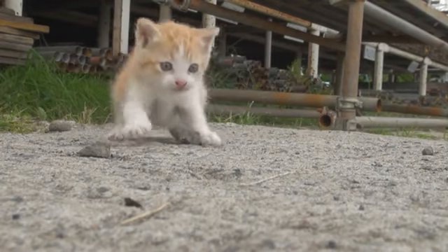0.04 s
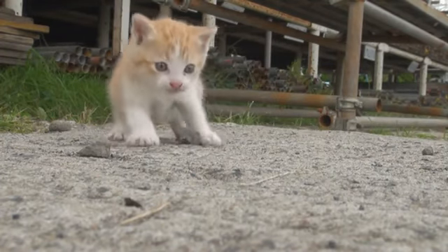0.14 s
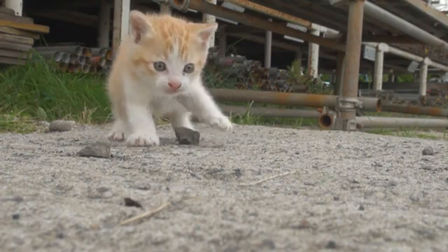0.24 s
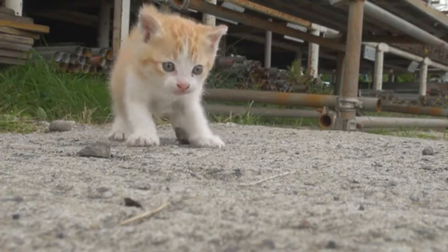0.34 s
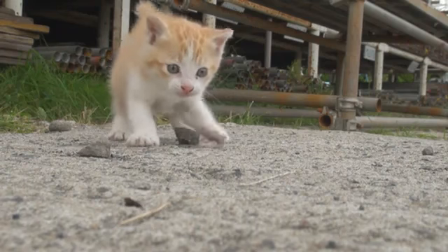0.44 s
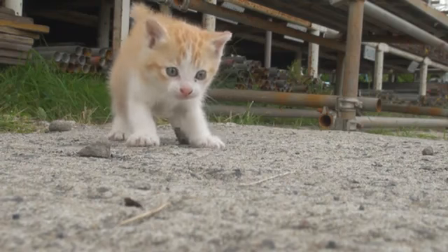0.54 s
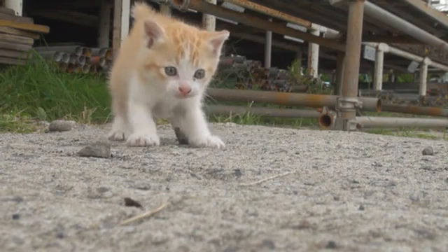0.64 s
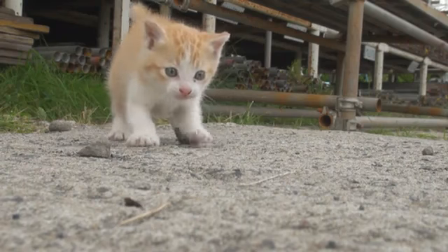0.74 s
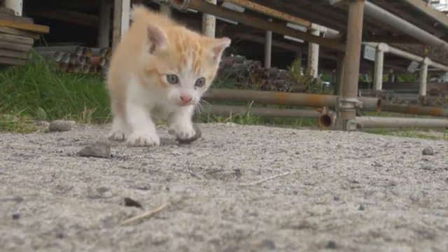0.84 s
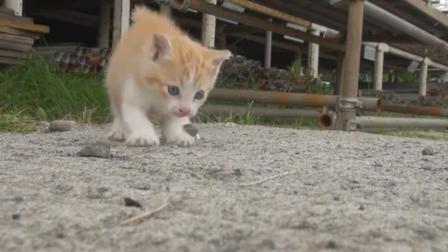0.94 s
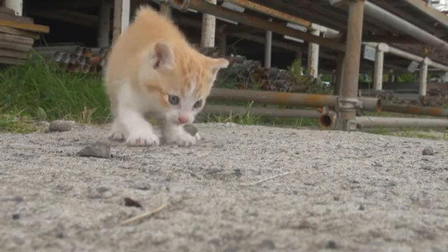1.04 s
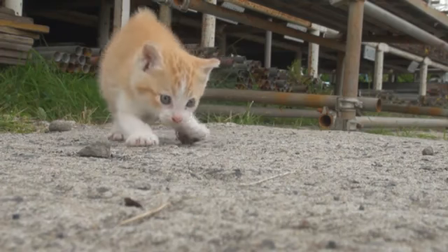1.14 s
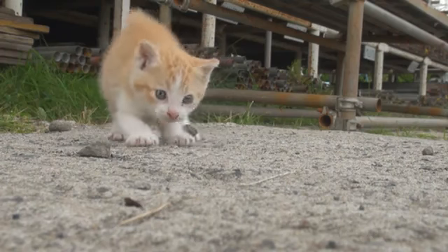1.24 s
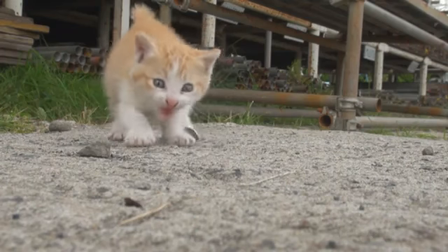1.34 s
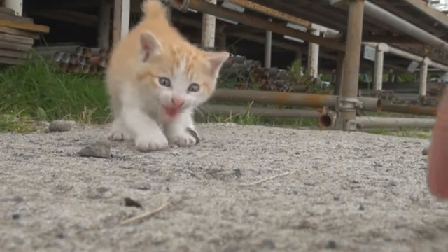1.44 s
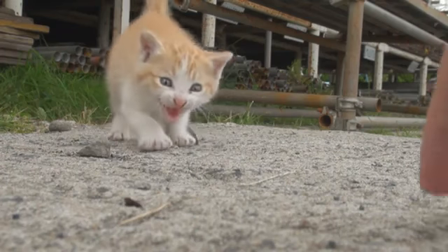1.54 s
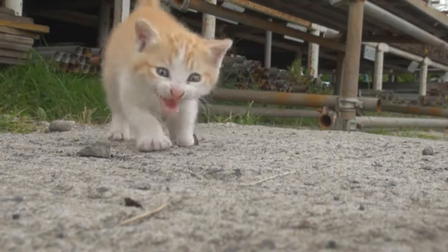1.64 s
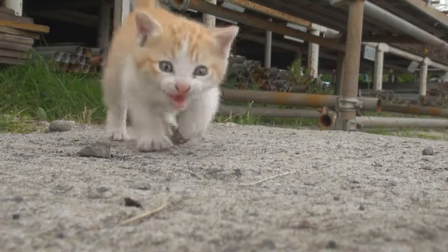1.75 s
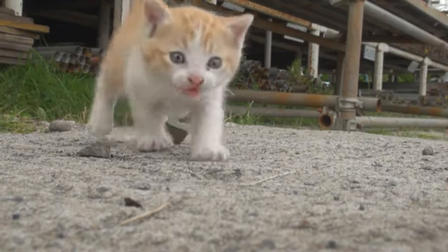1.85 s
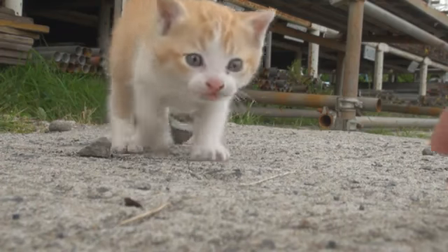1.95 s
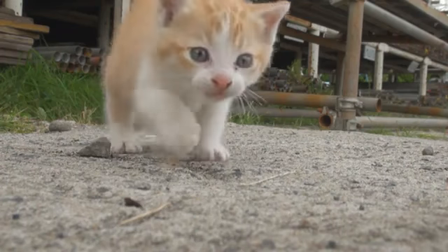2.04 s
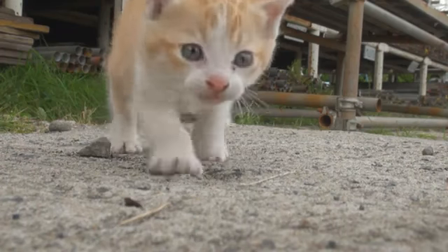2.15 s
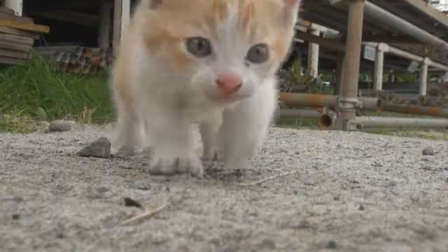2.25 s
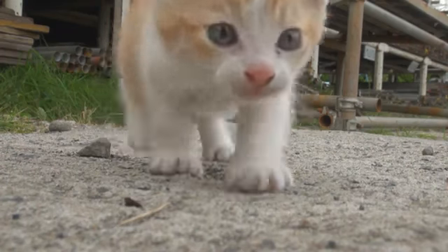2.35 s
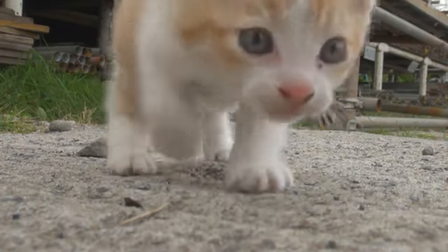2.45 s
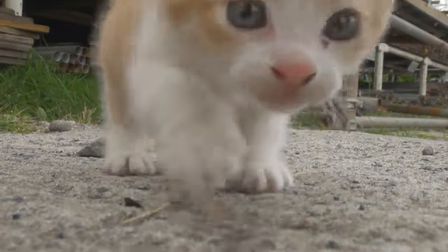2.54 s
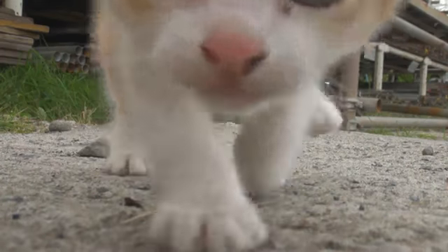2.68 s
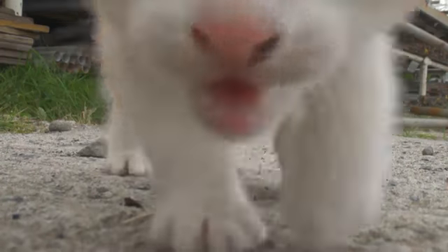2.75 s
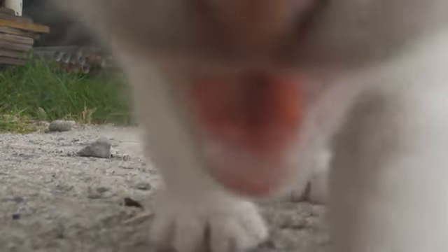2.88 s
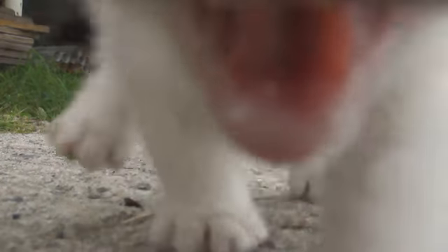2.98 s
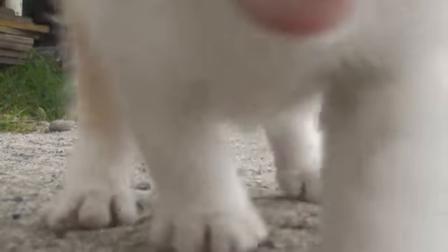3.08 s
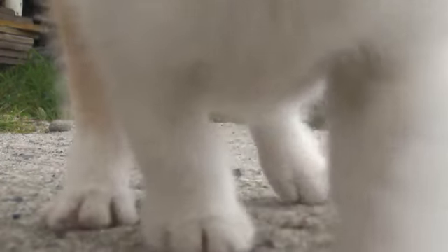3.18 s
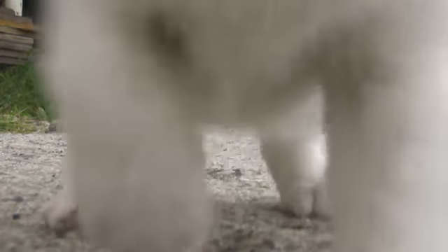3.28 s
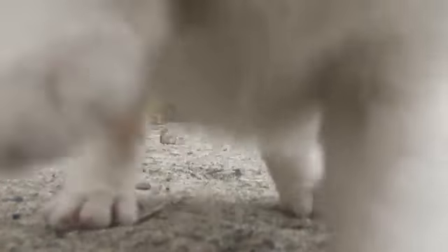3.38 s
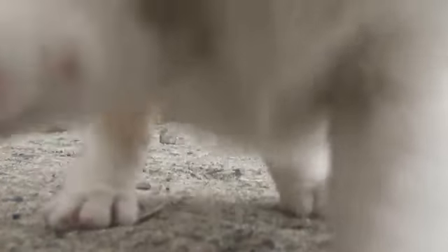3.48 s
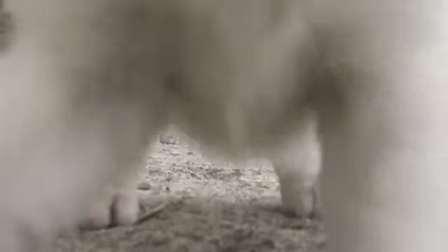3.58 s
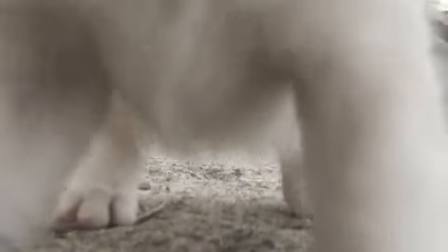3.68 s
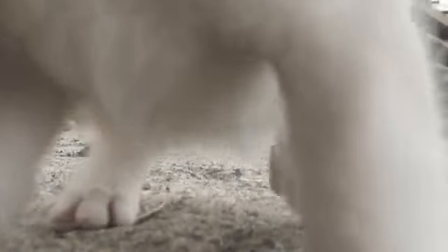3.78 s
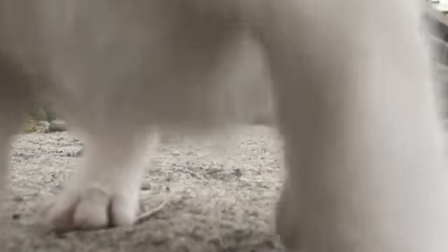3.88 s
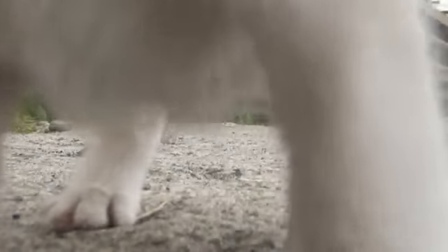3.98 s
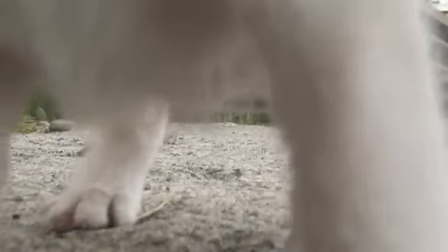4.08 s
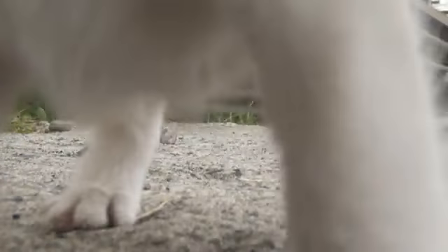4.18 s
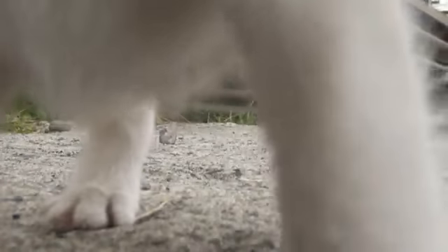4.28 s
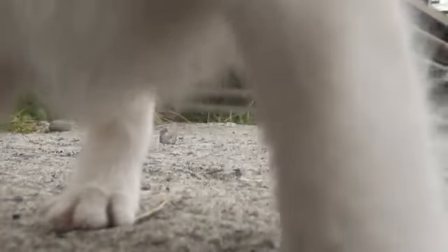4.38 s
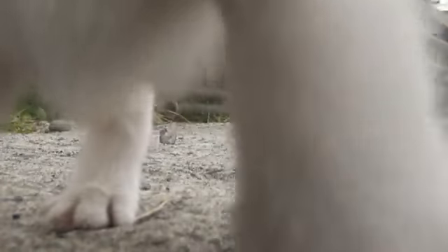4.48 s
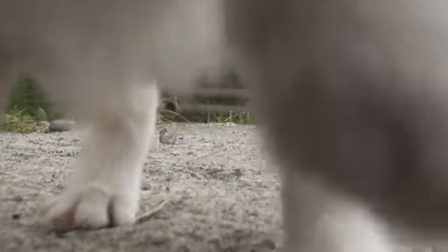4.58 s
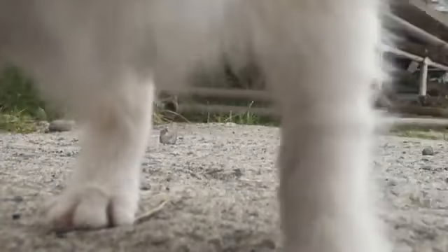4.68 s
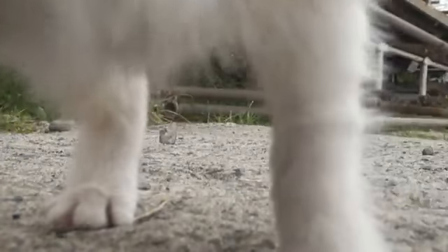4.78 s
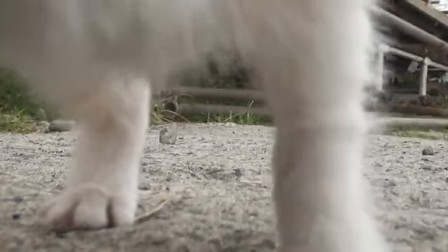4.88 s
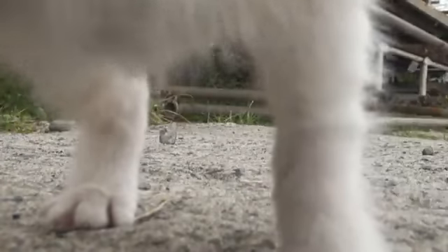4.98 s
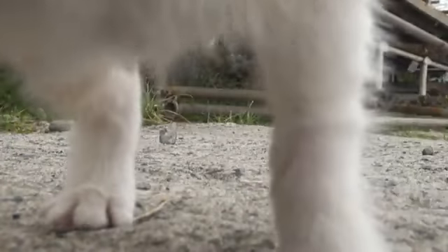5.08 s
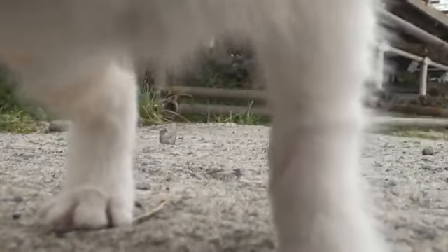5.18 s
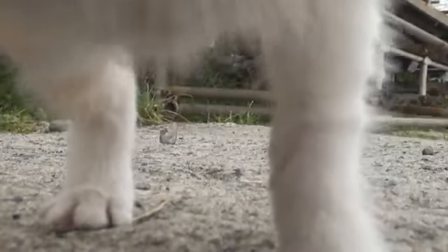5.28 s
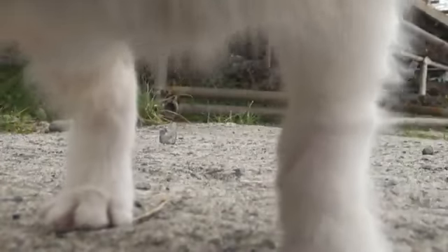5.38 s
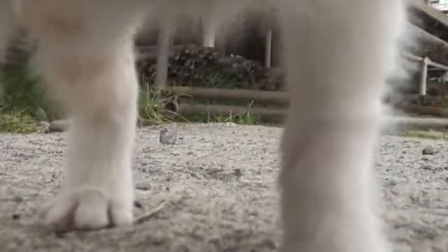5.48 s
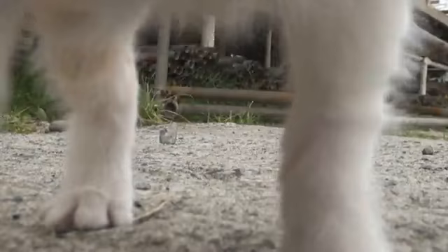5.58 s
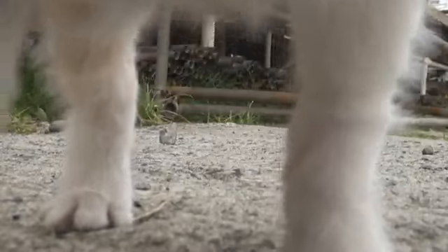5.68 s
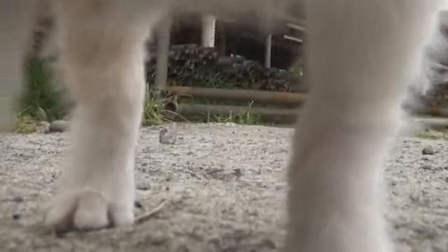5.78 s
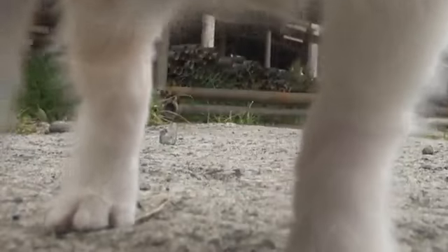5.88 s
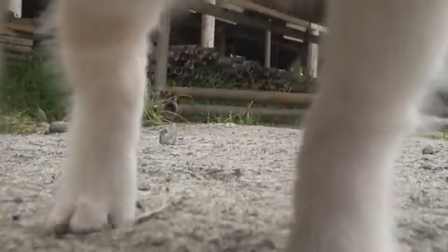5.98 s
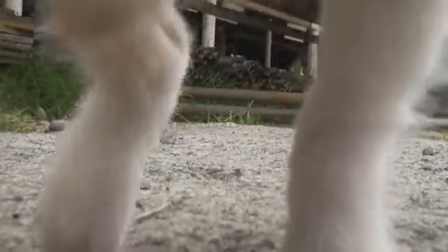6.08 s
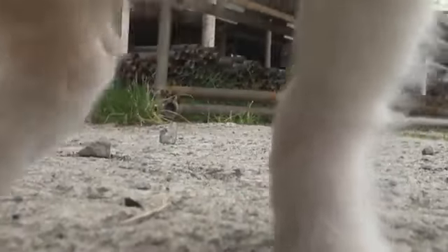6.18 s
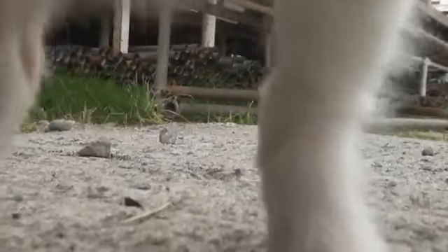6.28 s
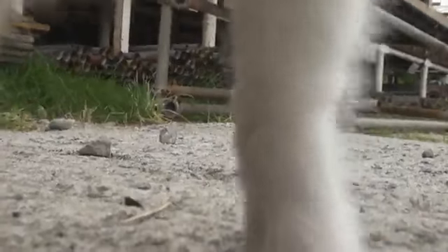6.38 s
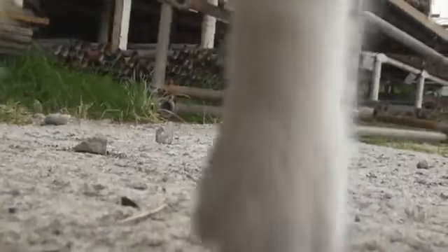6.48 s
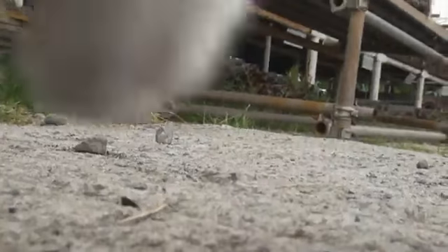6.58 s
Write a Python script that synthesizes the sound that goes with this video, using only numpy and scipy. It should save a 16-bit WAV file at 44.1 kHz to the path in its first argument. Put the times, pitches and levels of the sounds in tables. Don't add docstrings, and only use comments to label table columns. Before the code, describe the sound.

Soft paw scuffs on gravel and a faint distant bird, then four high kitten mews approaching to overloaded closeness, ending in a knock.

```python
import sys
import numpy as np
from scipy import signal
from scipy.fft import rfft, irfft
from scipy.io import wavfile
from scipy.ndimage import uniform_filter1d, minimum_filter1d

SR = 44100
rng = np.random.default_rng(int(sys.argv[2]) if len(sys.argv) > 2 else 0)


def boost(x):
    u = np.asarray(x, float) / 20
    return 10 ** u


def master(y):
    cut = np.clip(np.atleast_2d(y).T, -1, 1)
    pcm = np.round(cut * 32767)
    wavfile.write(sys.argv[1], SR, pcm.astype(np.int16))


N = 292369

# (frequency [Hz], level [dB per Hz])
WASH_SPECTRUM = [(12, -62), (20, -5), (48, -8.5), (70, 2), (92, -6), (129, -1), (221, -5), (397, -13),
                 (592, -15.5), (1920, -24.5), (2080, -25), (3100, -28.5), (5420, -32), (8770, -39.5),
                 (11800, -42.5), (15300, -80), (22000, -120)]
GRIT_SPECTRUM = [(880, -16.5), (1500, -11), (1830, -4), (3200, -5), (4010, -4.5), (4680, -4), (8260, -10.5),
                 (11800, -20), (15300, -50), (22000, -120)]
# (frequency [Hz], side under mid [dB])
STEREO_WIDTH = [(60, -21.5), (130, -32), (270, -10), (570, -2.5), (1200, -7.5), (2530, -7.5), (5350, -11.5),
                (11300, -5)]
# (frequency [Hz], width [Hz], level [dB])
MACHINE_TONES = [(60.5, 14, -39), (121.1, 13, -36.5), (222.1, 19, -42.5)]
# (deepest time [s], depth [dB], fall [s], recovery [s])
GAIN_DIPS = [
    (3.4, -3.5, .18, 0.083),
    (3.55, -1.5, 0.77, 1.),
    (4.95, -16, 0.18, 0.13),
    (5.2, -5, 0.15, 0.56),
    (5.8, -6, 0.055, 0.43),
]
# (time [s], pitch [Hz], level [dB])
BIRD_NOTES = [
    [(0.176, 624, -33), (0.184, 582, -28.5), (0.196, 606, -27), (0.225, 744, -28)],
    [(0.225, 717, -26), (0.247, 779, -32.5), (0.311, 875, -36.5), (0.341, 1020, -36), (0.351, 1167, -31),
     (0.385, 1230, -47)],
    [(0.435, 1014, -33), (0.459, 870, -36), (0.517, 896, -37.5), (0.565, 1000, -36)],
    [(0.565, 1063, -36), (0.605, 1104, -38), (0.632, 890, -36)],
    [(0.632, 861, -37.5), (0.742, 843, -32), (0.84, 817, -30), (0.866, 812, -35), (0.92, 887, -39.5),
     (0.98, 851, -36.5), (1.05, 832, -38)],
]
# (frequency [Hz], level [dB])
BEAK_COLOUR = [(600, 3), (770, -12), (820, -12), (865, 4.5), (1200, -1.5), (1630, -3.5), (1980, -15),
               (2500, -8.5)]
# (middle time [s], length [s], level [dB])
PAW_STROKES = [
    (0.082, 0.15, -35),
    (0.503, 0.39, -29),
    (0.778, 0.17, -34.5),
    (1.035, 0.25, -29.5),
    (1.296, 0.26, -41),
]
# (time [s], peak [dB], centre [Hz], t60 [s], left over right [dB])
TICKS = [(1.3314, -25, 2050, 0.0025, -1.0), (1.973, -15, 1874, 0.0036, 7), (2.2194, -7, 1750, 0.0023, 7),
         (2.954, 0, 5000, 0.0019, 14.5), (3.721, -14.5, 1780, 0.0038, 1), (3.799, -16, 1890, 0.0043, -3),
         (4.13, -16, 2310, 0.0034, -0.5), (4.411, -9, 1490, 0.0031, -4), (0.179, -20, 1200, 0.0046, 2),
         (4.5874, 8, 6570, 0.0011, 9), (4.5936, -3, 1900, 0.003, 10), (4.5965, -4, 2300, 0.0033, 2),
         (4.6025, -7, 2300, .003, 0), (4.6, -6, 9200, 0.0034, 3), (4.6051, 0.5, 12240, 0.0035, 23),
         (5.604, 8.5, 6000, 0.00076, 5), (6.613, -6, 4500, 0.0015, -3), (4.6255, -8, 3100, 0.005, 5)]
# (time [s], peak [dB], centre [Hz], # t60 [s],
# left over right [dB])
GULPS_BUMPS_AND_CREAKS = [(1.813, -24, 500.5, 0.035, -3), (1.936, -22, 1500, .012, 2),
                          (1.953, -22, 1650, .02, -4.5), (1.97, -21, 850, 0.023, 0), (3.547, -3.5, 450, 0.048, -6),
                          (3.5485, -8, 880, 0.033, -9), (5.207, -5.5, 104, 0.056, 3), (5.2206, -11, 110, .04, 0),
                          (5.284, -13, 750, .03, 0), (6.286, -7.5, 1120, 0.015, 4), (6.264, -12, 430, 0.017, 3),
                          (6.457, -15, 420, 0.064, 5)]
# (time [s], level [dB], frequency [Hz], t60 [s], left over right [dB])
SHELL_KNOCK = [
    (6.6251, 0.5, 4300, 0.0093, 4),
    (6.6254, 13, 1380, 0.007, 8.5),
    (6.6262, -1, 2820, 0.0096, 7),
    (6.6275, -4, 710, 0.017, 3),
]
# (middle time [s], half length [s], frequency [Hz], level [dB])
SIGHS = [
    (1.955, 0.0072, 1700, -36),
    (3.566, 0.009, 6600, -23),
    (5.295, .01, 6500, -16),
    (6.47, 0.017, 6500, -28),
]
# (time [s], effort [dB], mouth resonance [Hz], upper resonance level [dB])
FAR_MEWS = [
    [(1.48, -26, 3900, -8), (1.586, -19, 4240, 1), (1.648, -16, 3980, 0.5), (1.714, -10.5, 3980, -4),
     (1.84, -18, 3240, -7), (1.925, -33, 2790, -9), (1.99, -60, 2570, 16.5)],
    [(2.95, -22.5, 4320, 3.5), (3.016, -13.5, 4300, 6.5), (3.126, -13, 4460, 4.5),
     (3.192, -8.5, 4390, -2.5), (3.268, -6.5, 3964, -6), (3.388, -7, 3930, -1), (3.475, -5, 3490, -8.5),
     (3.545, -10.5, 3183, 0), (3.59, -42.5, 3370, 15)],
]
NEAR_MEWS = [
    [(4.615, -24.5, 3160, -2.5), (4.691, -10, 4040, -1.5), (4.769, -9, 4080, -1), (4.871, -9, 3540, -5.5),
     (5.02, -9.5, 3060, -8), (5.123, -14.5, 2860, -3.5), (5.2, -16.5, 2740, -3), (5.28, -33.5, 2820, 12),
     (5.335, -38.5, 4500, 12.5)],
    [(5.62, -20, 3540, 5.5), (5.666, -13, 3940, -6), (5.768, -18, 4100, 8.5), (5.87, -21.5, 4070, 11.5),
     (5.946, -12, 3400, 2), (6.07, -6, 3287, -5.5), (6.156, -2.5, 3040, -14), (6.39, -16, 2850, -7.5),
     (6.5, -49.5, 3000, 17)],
]
# (time [s], pitch [Hz])
PITCH = [
    [(1.48, 403), (1.518, 400), (1.552, 446), (1.586, 525), (1.648, 648.6), (1.714, 676), (1.828, 504.4),
     (1.958, 218.5), (1.99, 180)],
    [(2.95, 455.3), (3.016, 395.4), (3.126, 587.5), (3.192, 495), (3.268, 513.4), (3.492, 513),
     (3.536, 408), (3.564, 252.7), (3.6, 206)],
    [(4.615, 230.7), (4.691, 395), (4.769, 452.4), (4.885, 487), (4.991, 444.3), (5.04, 392),
     (5.191, 310.2), (5.275, 203.8), (5.335, 202)],
    [(5.62, 206.3), (5.666, 276.5), (5.745, 471), (5.946, 564.7), (6.07, 575.2), (6.125, 552.7),
     (6.288, 408), (6.378, 349.5), (6.5, 225.6)],
]
# (time [s], upper resonance [Hz], chest change [dB], middle change [dB])
FAR_THROATS = [
    [(1.48, 8300, 2, 3), (1.55, 7650, 0, -3), (1.63, 6850, -1.5, 0), (1.71, 6440, 0.5, 2),
     (1.8, 6200, -1, 6), (1.87, 6370, -0.5, 1), (1.92, 6570, 2, 1), (1.99, 6240, 8, -1)],
    [(2.95, 6950, 0.5, -4), (3.0, 7000, -1.5, -2.5), (3.07, 6240, 0.5, 5.5), (3.15, 6400, 0, 5.5),
     (3.22, 6200, -1.5, 8), (3.26, 6660, -2.5, -8.5), (3.4, 6370, -1, -12), (3.51, 6400, 1, -2),
     (3.59, 6644, 1.5, -13)],
]
NEAR_THROATS = [
    [(4.615, 7400, 10.5, -1), (4.66, 7500, 4.5, 0), (4.71, 7160, -1.5, -2.3), (4.8, 6700, -2, -5),
     (4.94, 6700, -3.5, 0), (5.08, 6900, 2.5, 3), (5.2, 6970, 0, 3), (5.27, 6500, 1, -4),
     (5.335, 6550, -3, 1)],
    [(5.62, 6900, 13.5, 12), (5.68, 7300, -1.5, -6), (5.76, 6600, -3.5, 3), (5.86, 6420, 1.5, 2.5),
     (5.97, 6280, -1.5, -3.5), (6.12, 6400, -4, 3.5), (6.26, 6150, 0, -3.5), (6.37, 5790, -3.5, -3),
     (6.5, 6600, -2, -11)],
]
# (whisper before the folds catch [s], rise [s], whisper under the voice [dB])
ONSETS = [(0.0052, 0.035, -17), (0.0255, 0.002, -10), (0.0084, 0.026, -14.5), (0.0046, 0.026, -19)]
# (chest [dB], lowest partial [dB], middle resonance [dB], its lag [radians])
THROAT_LEVELS = [(-2.5, -38.5, -9, .3), (-4, -33, -9.5, 0.39), (-3.5, -32, -6.5, 1.53),
                 (-4, -32, -8.5, 0.44)]
# (onset breathiness [0-1], clearing time [s], end breathiness [0-1], its lead before the end [s])
SLACK_FOLDS = [(.13, .2, .4, .1), (.1, .2, .8, .042), (.15, .1, .8, .052), (.17, .12, .75, .062)]
# (mouth width [Hz], upper width [Hz], highest resonance [Hz], its level under the upper one [dB])
RESONANCE_WIDTHS = [(623, 1150, 9500, -21), (423, 960, 9520, -12.5), (440, 1060, 10420, -17.5),
                    (418, 650, 8940, -18)]
# (frequency [Hz], width [Hz], level [dB])
CHEST_RESONANCES = [(977, 1000, -19), (1500, 1180, 8.5), (2390, 1470, 6)]
# (time [s], pitch drop [share],
# length [s])
VOICE_CATCHES = [(1.608, 0.061, 0.0087), (1.633, 0.013, 0.0053), (1.681, 0.051, 0.00534),
                 (1.706, 0.035, 0.00499), (1.558, 0.038, .006), (3.388, 0.015, 0.048),
                 (3.423, -0.018, 0.03), (5.083, -0.031, 0.014), (5.137, 0.012, 0.014),
                 (6.251, -0.038, 0.0044), (6.334, -0.02, 0.0093), (6.194, .02, 0.0093),
                 (4.746, 0.023, 0.008), (6.275, 0.042, 0.0066),
                 (2.989, -.07, .008), (3.053, .058, .007), (3.106, .08, .008), (3.138, .045, .005),
                  (5.752, .035, .014), (5.675, .06, .012)]
# (middle time [s], half length [s], chest air [0-1], upper throat air [0-1])
HOARSE_SPELLS = [(1.505, .025, .3, .2), (1.6, .03, .1, .1), (3.0, .04, .35, .25), (3.1, .05, .55, .25),
                 (5.1, .1, 0, .3), (5.245, .045, .45, .3), (5.7, .045, .2, .4), (5.88, .08, 0, .15),
                 (6.19, .07, 0, .45), (6.28, .022, .9, .4), (6.41, .05, .2, .35)]
# (middle time [s], half length [s], frequency [Hz], #
# width [Hz], removed [share], negative adds)
BAND_CHANGES = [(1.68, 0.088, 9000, 600, .7), (1.92, 0.054, 1430, 460, -1.4),
                (1.894, .04, 3110, 300, -0.36), (3.01, 0.045, 3120, 580, 0.98),
                (3.06, 0.07, 2000, 1400, 0.45), (4.645, 0.046, 11000, 1600, 0.69),
                (5.255, 0.07, 2650, 800, 0.25), (6.37, 0.11, 6000, 1040, 0.7),
                (6.3, .1, 7800, 1100, -0.67), (1.96, 0.031, 1500, 2500, 0.58),
                (6.13, 0.11, 7650, 500, .85), (5.8, .06, 3600, 350, .6), (3.45, 0.13, 4700, 350, .6),
                (3.36, 0.13, 2560, 400, 0.48), (4.73, 0.072, 11000, 1800, 0.53), (5.1, .1, 4340, 430, .5),
                (3.03, .06, 4300, 400, 0.27), (3.525, .02, 6500, 1100, 0.34),
                (1.8, 0.046, 1800, 1500, 0.23), (3.011, .04, 8600, 400, .7), (3.097, .03, 3700, 400, 1),
                (3.104, 0.088, 990, 290, 0.68), (3.212, 0.043, 2500, 920, 0.7),
                (3.41, 0.061, 4670, 400, 0.91), (3.421, 0.081, 8200, 820, 0.9),
                (3.35, 0.16, 2800, 630, -0.037), (4.71, 0.1, 5800, 440, 0.75),
                (4.724, 0.074, 1600, 1200, 0.45), (4.84, .08, 9288, 600, 0.77),
                (5.247, 0.085, 1460, 620, -0.63), (5.25, 0.055, 3230, 460, -0.78),
                (5.757, 0.054, 3700, 500, 0.71), (5.76, 0.11, 880, 490, 0.6),
                (5.8, 0.14, 8856, 650, 0.71), (6.1, 0.17, 8316, 920, 1), (5.93, 0.12, 4540, 500, 0.78),
                (5.952, 0.067, 3900, 280, -0.94), (5.9, 0.29, 2280, 420, -0.79),
                (6.33, 0.094, 1730, 840, 0.52)]
# (frequency [Hz], left over right [dB])
PORT_BALANCE = [
    [(60, 0.42), (11000, 0.18)],
    [(60, -0.091), (140, -0.087), (340, -4.5), (820, -4), (1970, -1.5), (4720, -3.5), (11300, 1.5)],
    [(60, -4), (140, 15), (340, 2), (820, -3), (1970, 1.5), (4720, 1), (11300, 5)],
    [(60, -2), (140, -2), (340, -2), (820, -1), (1970, 3.5), (4720, 3.5), (11300, 6.5)],
]
# (frequency [Hz], left lead [radians])
PORT_LEAD = [
    [(0, 0), (11500, 0.013)],
    [(0, 0.019), (11500, -0.0)],
    [(0, -0.15), (600, -0.95), (860, -0.9), (1720, -0.87), (2670, -0.67), (4570, -0.353), (11500, 0.2)],
    [(0, 0.73), (1030, -1.14), (1460, -0.5), (6290, -0.203), (8530, 0.93), (9730, 1), (11500, -0.47)],
]


def evened(x, size=None):
    if size is None:
        power = np.mean(x ** 2)
    else:
        power = uniform_filter1d(uniform_filter1d(x ** 2, size), size)
    return x / np.sqrt(abs(power) + 1e-20)


def read(points, hz):
    f, value = np.transpose(points)
    return np.interp(np.log(hz + 1), np.log(f + 1), value)


def curves(rows):
    s, *columns = np.transpose(rows)
    t = np.arange(s[0], s[-1], 1 / SR)
    return s[0], [np.interp(t, s, column) for column in columns]


def drift(count, size):
    return evened(uniform_filter1d(uniform_filter1d(rng.standard_normal(count), size), size))


def resonate(x, hz, width, lag=0):
    turn = np.exp(2j * np.pi * np.cumsum(hz * np.ones(len(x))) / SR)
    r = np.exp(-np.pi * width / SR)
    smooth = signal.lfilter([1 - r], [1, -r], x / turn)
    return 2 * (turn * smooth * np.exp(-1j * lag)).real


def cavity(x, hz, width, skirt_width, lag=0):
    return resonate(resonate(x, hz, width), hz, skirt_width, lag)


def add(mix, s, sound, pan_db=0):
    part = mix[:, round(s * SR):][:, :sound.shape[-1]]
    panned = sound * boost(np.array([[.5], [-.5]]) * pan_db)
    part += panned[:, :part.shape[1]]


def noise(spectrum, patchy_db):
    frames, hz = N // 256 + 5, np.fft.rfftfreq(1024, 1 / SR)
    a, b, c, d, patches = rng.standard_normal((frames, 513, 5)).T
    patches = evened(uniform_filter1d(uniform_filter1d(patches, 12, 0), 10, 1))
    mid = a + 1j * b
    side = boost(read(STEREO_WIDTH, hz))[:, None] * (c + 1j * d)
    level = boost(read(spectrum, hz)[:, None] + patchy_db * patches)
    z = np.array([mid + side, mid - side]) * level
    return evened(signal.istft(z, nperseg=1024, noverlap=768)[1][:, :N])


def open_air_wash():
    return boost(-29.5) * noise(WASH_SPECTRUM, patchy_db=1.5)


def machine_hum():
    return sum(boost(db) * evened(cavity(rng.standard_normal(N), hz, width, width))
               for hz, width, db in MACHINE_TONES)


def ducking():
    t = np.arange(N) / SR
    dips = sum(db * np.exp(-((t - s) / np.where(t < s, fall, recovery)) ** 2)
               for s, db, fall, recovery in GAIN_DIPS)
    return boost(dips)


def yard_echoes(x, t60=0.97):
    t = np.arange(SR // 5) / SR
    signs = rng.choice([-1., 1.], (2, len(t)))
    sparse = rng.random((2, len(t))) < .05
    taps = signs * sparse * boost(-60 * t / t60) * (t > .002)
    return signal.fftconvolve(x, taps / np.linalg.norm(taps[0]), axes=1)[:, :N]


def bird_note(rows):
    s, (hz, level_db) = curves(rows)
    turns = np.cumsum(hz * (1 + 0.0072 * drift(len(hz), size=150))) / SR
    tone = 0
    for k in range(1, 4):
        partial_db = level_db + read(BEAK_COLOUR, k * hz) + 0.82 * drift(len(hz), size=400)
        tone = tone + boost(partial_db) * np.sin(2 * np.pi * k * turns)
    return s, np.sqrt(2) * tone * signal.windows.tukey(len(hz), .04)


def far_bird():
    bird = np.zeros((2, N))
    for rows in BIRD_NOTES:
        add(bird, *bird_note(rows), pan_db=6.5)
    lag_s = 0.000067
    bird[1] = np.interp(np.arange(N) - lag_s * SR, np.arange(N), bird[1])
    return bird


def stone_scuff():
    t = np.arange(N) / SR
    power = sum(boost(db - 5.2 * (2 * (t - s) / length) ** 2) ** 2 for s, length, db in PAW_STROKES)
    grains = boost(2.0 * drift(N, size=40))
    return np.sqrt(power) * grains * noise(GRIT_SPECTRUM, patchy_db=-0.5)


def tap(db, hz, t60, crack):
    t = np.arange(2500) / SR
    click = np.diff(rng.standard_normal(len(t) + 1)) * 1.2
    ring = (1 - crack) * np.sin(2 * np.pi * hz * t) + crack * click
    return boost(db - 60 * t / t60) * ring * np.minimum(t / 0.00063, 1)


def add_taps(mix, events, crack):
    for s, db, hz, t60, pan_db in events:
        add(mix, s, tap(db, hz, t60, crack), pan_db)


def sigh(s, span, hz, db):
    t = np.arange(-3 * span, 3 * span, 1 / SR)
    air = cavity(rng.standard_normal(4000)[:len(t)], hz, 1700, 2600)
    return s + t[0], boost(db) * evened(air) * np.exp(-(t[:4000] / span) ** 2)


def ports(x, balance, lead):
    hz = np.fft.rfftfreq(len(x), 1 / SR)
    half = boost(read(balance, hz) / 2) * np.exp(.5j * read(lead, hz))
    return irfft(rfft(x) * np.array([half, 1 / half]), len(x))


def breathiness(since, hz, catch, slack):
    onset, clears_s, end, sets_in_s = slack
    ends = onset * np.exp(-(since / clears_s) ** 3) + end * np.exp(-(since[::-1] / sets_in_s) ** 5)
    sag = 1 - hz / hz.max()
    return np.minimum(.02 + ends + .27 * sag + 1.2 * np.maximum(catch, 0), .95)


def fold_turns(hz, breath):
    uneven = .055 * (breath + .02) * drift(len(hz), size=60)
    uneven = uneven + (.045 * breath + .003) * drift(len(hz), size=350)
    return np.cumsum(hz * (1 + uneven)) / SR


def fold_pulses(hz, turns, breath):
    pulses = 0
    for k in range(2, 60):
        waver_db = 1.6 * min(k / 8, 1) * drift(len(hz), size=round(.018 * SR))
        pulses = pulses + np.cos(2 * np.pi * k * turns) * (k * hz < 13000) * boost(waver_db)
    shimmer_db = (1.5 * breath + 1.0) * drift(len(hz), size=120)
    return pulses / np.sqrt(6500 / hz) * boost(shimmer_db)


def mouth_tone(drive, hz, width, breath):
    mouth = cavity(drive, hz, width, 2.46 * width)
    mouth = mouth + .28 * resonate(mouth, hz, 290)
    return mouth - np.maximum(0.7 - 2.9 * breath, 0) * resonate(mouth, 1.237 * hz, 420)


def throat_tone(drive, gated, mouth_hz, upper_hz, middle_db, middle_lag, widths):
    _, upper_width, top_hz, top_db = widths
    size = len(drive)
    upper = cavity(drive, upper_hz, upper_width, 6.3 * upper_width)
    middle = cavity(drive, 0.6 * mouth_hz + 0.36 * upper_hz, 1230, 3200, middle_lag)
    top_hz = top_hz * (1 + .02 * drift(size, size=2500))
    top = cavity(drive + .45 * gated, top_hz, 2400, 2400)
    top_level = boost(top_db + 3.5 * drift(size, size=2500))
    return evened(upper - boost(middle_db) * middle, size=900) + top_level * evened(top, size=900)


def chest_tone(deep, mouth_hz, hz):
    shut = (mouth_hz / 3400) ** 0.6 * (hz / hz.max()) ** 0.37
    chest = sum(boost(db) * cavity(deep, f * shut, width, 2.6 * width) for f, width, db in CHEST_RESONANCES)
    return evened(chest, size=900)


def change_bands(voice, t):
    for middle_s, span, hz, width, share in BAND_CHANGES:
        if t[0] < middle_s < t[-1]:
            strength = min(share, 1) * np.exp(-((t - middle_s) / span) ** 4)
            voice = voice - strength * resonate(voice, hz, width)
    return voice


def mew(rows, pitch, back, onset, throat, slack, widths):
    s, (effort_db, mouth_hz, upper_db) = curves(rows)
    since = np.arange(len(effort_db)) / SR
    t, left = s + since, since[::-1]
    hz = uniform_filter1d(np.interp(t, *np.transpose(pitch)), size=800, mode="nearest")
    whisper_s, rise_s, whisper_db = onset
    effort_db = effort_db + whisper_db * np.clip(1 - (since - whisper_s) / rise_s, 0, 1)
    effort_db = effort_db - 3 * np.maximum(1 - left / .024, 0)
    back_s, *columns = np.transpose(back)
    upper_hz, chest_change_db, middle_change_db = (np.interp(t, back_s, c) for c in columns)
    chest_db, lowest_db, middle_db, middle_lag = throat
    chest_db = chest_db + chest_change_db + upper_db - 8 * (mouth_hz - 3400) / 1000
    lowest_db = lowest_db + .67 * (effort_db + 10.0)

    catch = sum(drop * np.exp(-((t - at) / span) ** 2) for at, drop, span in VOICE_CATCHES)
    breath = breathiness(since, hz, catch, slack)
    chest_air, upper_air = sum(np.outer(air, np.exp(-((t - at) / span) ** 4))
                               for at, span, *air in HOARSE_SPELLS)
    hz = hz * (1 - catch)
    turns = fold_turns(hz, breath)
    voiced = (1 - breath) * fold_pulses(hz, turns, breath)
    gated = evened((.25 + np.exp(-(turns % 1) / .3)) * rng.standard_normal(len(hz)))
    puffs = (1.5 * breath ** 2 + .004) * gated
    drive = voiced + puffs
    deep = voiced + 6 * puffs + chest_air * gated

    mouth = mouth_tone(drive + (.045 + upper_air / 8) * gated, mouth_hz, widths[0], breath)
    leak = (.45 + 3.6 * since / since[-1]) * breath
    drive = drive + (.09 + upper_air + leak) * gated
    middle_db = middle_db + middle_change_db + 20.0 * np.minimum(breath, .2)
    upper = throat_tone(drive, gated, mouth_hz, upper_hz, middle_db, middle_lag, widths)
    voice = evened(mouth, size=900) + boost(upper_db) * upper
    voice = voice - boost(chest_db) * chest_tone(deep, mouth_hz, hz)
    voice = change_bands(voice, t)
    rumble = evened(cavity(gated, 796, 740, 740))
    voice = voice + boost(-32 + upper_db / 2) * rumble
    voice = signal.sosfilt(signal.butter(2, 150, "high", fs=SR, output="sos"), voice)
    lowest = np.sqrt(2) * boost(lowest_db) * np.cos(2 * np.pi * turns)
    return s, (boost(effort_db) * voice + lowest) * signal.windows.tukey(len(hz), .03)


def kitten_at_camera():
    kitten = np.zeros((2, N))
    mews = zip(FAR_MEWS + NEAR_MEWS, PITCH, FAR_THROATS + NEAR_THROATS, ONSETS, THROAT_LEVELS,
               SLACK_FOLDS, RESONANCE_WIDTHS, PORT_BALANCE, PORT_LEAD)
    for *shape, balance, lead in mews:
        s, voice = mew(*shape)
        add(kitten, s, ports(voice, balance, lead))
    add_taps(kitten, TICKS, crack=0.38)
    add_taps(kitten, SHELL_KNOCK, crack=0.09)
    add_taps(kitten, GULPS_BUMPS_AND_CREAKS, crack=0.011)
    for row in SIGHS:
        add(kitten, *sigh(*row))
    return kitten


def scene():
    background = (open_air_wash() + machine_hum()) * ducking()
    bird = far_bird()
    bird = bird + boost(-22) * yard_echoes(bird)
    kitten = kitten_at_camera()
    kitten = kitten + boost(-36) * yard_echoes(kitten)
    return background + bird + stone_scuff() + kitten


def lose_faint_detail(x, under_db=24., side_db=13.):
    mid, side = signal.stft([x[0] + x[1], x[0] - x[1]], nperseg=1024, noverlap=768)[2]
    strongest_near = -minimum_filter1d(-abs(mid), size=31, axis=0)
    mid = mid * np.where(abs(mid) < strongest_near * boost(-under_db), .12, 1)

    def band(z):
        means = abs(z[:512]).reshape(32, 16, -1).mean(1)
        return np.repeat(uniform_filter1d(means, size=4, axis=1), 16, 0)

    treble = np.clip((np.arange(513)[:, None] * SR / 1024 - 4500) / 3500, 0, 1)
    blotches = uniform_filter1d(rng.standard_normal(mid.T.shape).T, size=9, axis=0)
    blotches = evened(uniform_filter1d(blotches, size=7, axis=1))
    mid = mid * boost(treble * 3.5 * blotches) * np.exp(.5j * treble * blotches[::-1])
    side[:512] *= band(side) > band(mid) * boost(-side_db) + boost(-84)
    mid, side = signal.istft([mid, side], nperseg=1024, noverlap=768)[1][:, :N]
    return np.array([mid + side, mid - side]) / 2


def low_pass(x):
    return signal.sosfilt(signal.butter(12, 11910, fs=SR, output="sos"), x)


def record(dry):
    saturated = np.clip(dry, -1.12, 1.08)
    band_limit = signal.firwin(511, 11900, window=("kaiser", 9), fs=SR)
    limited = signal.oaconvolve(lose_faint_detail(saturated), band_limit[None], "same")
    return low_pass(np.clip(limited, -1, 1))


dry = scene()
out = record(dry)
master(out)
```